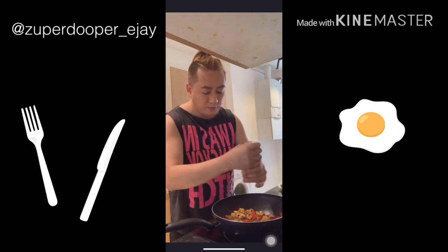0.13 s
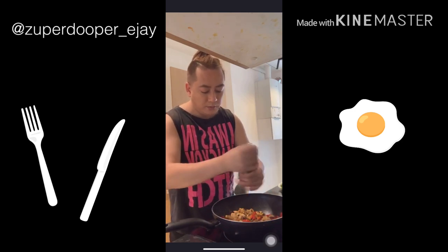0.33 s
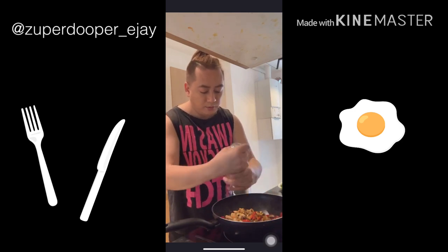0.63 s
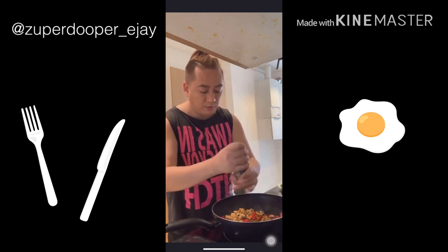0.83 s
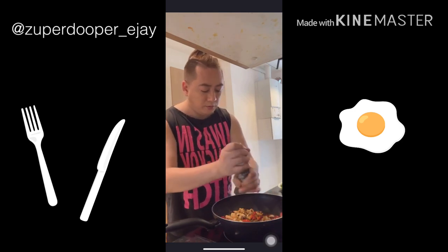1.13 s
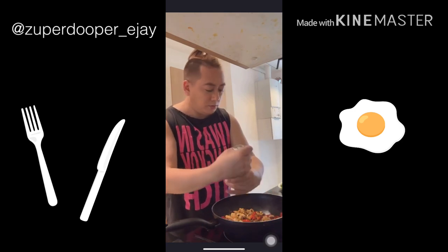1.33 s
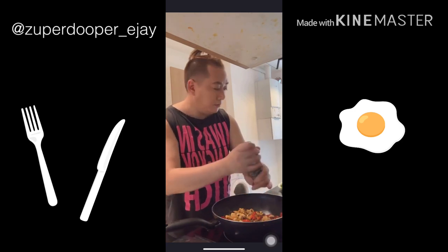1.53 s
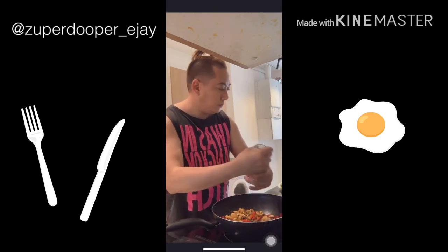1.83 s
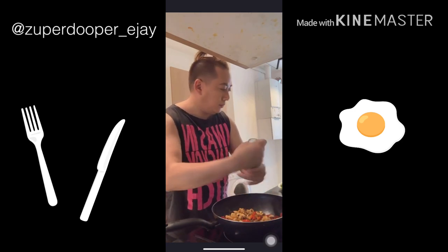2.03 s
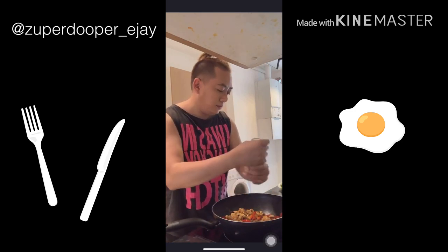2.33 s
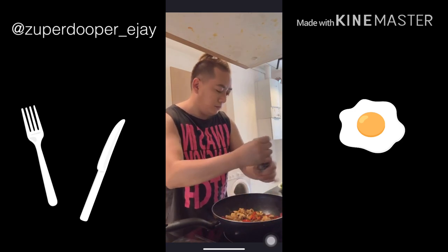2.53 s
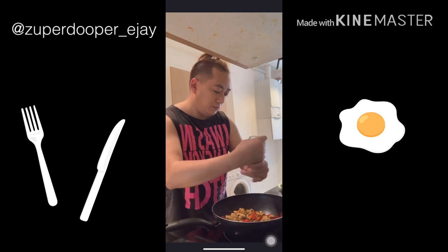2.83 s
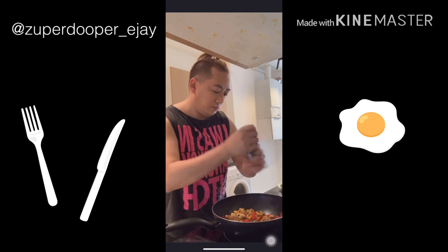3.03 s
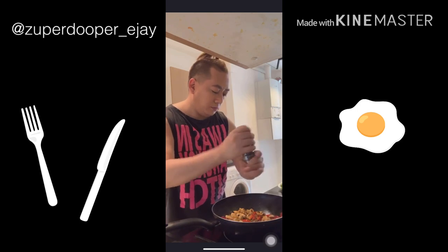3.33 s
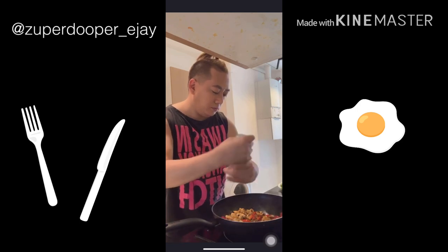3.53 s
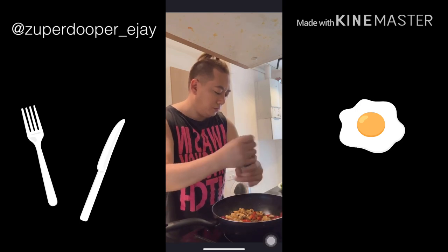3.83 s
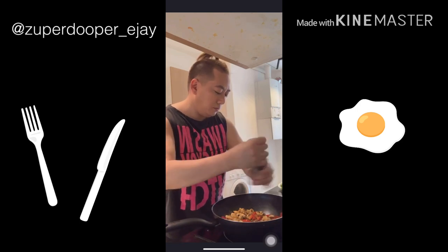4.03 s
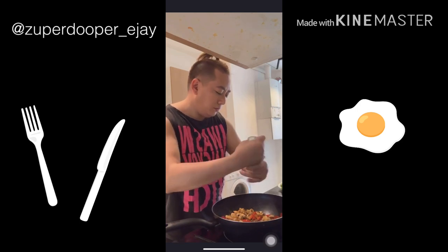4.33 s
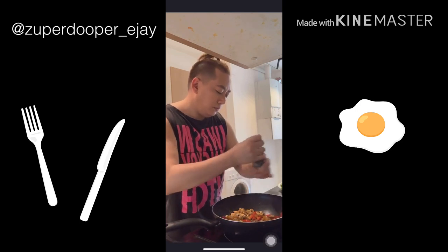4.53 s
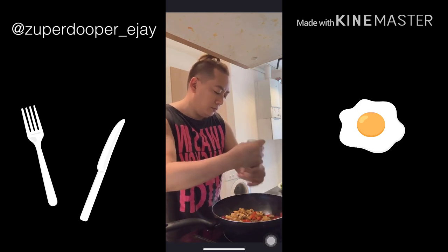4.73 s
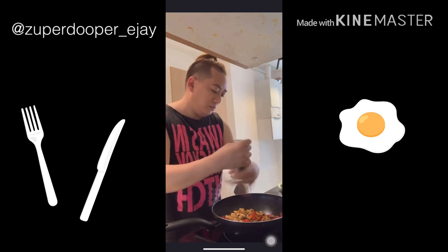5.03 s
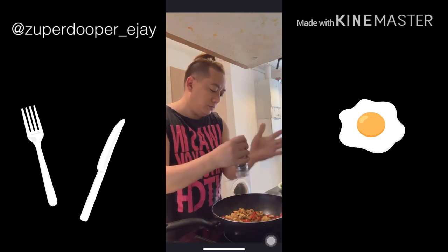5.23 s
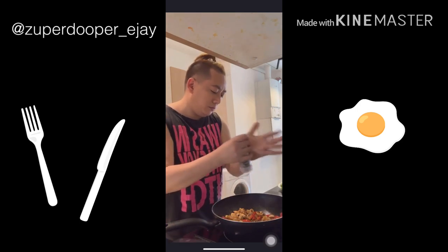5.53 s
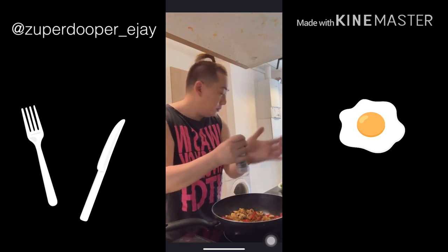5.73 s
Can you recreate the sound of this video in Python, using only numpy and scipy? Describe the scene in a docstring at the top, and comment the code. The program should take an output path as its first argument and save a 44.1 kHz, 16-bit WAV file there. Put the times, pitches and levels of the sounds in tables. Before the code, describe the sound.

A hand pepper mill crunches peppercorns in sharp, irregular cracks about three twists a second, then gets shaken, over a low fan hum.

```python
"""A hand pepper mill is twisted back and forth over a wok in a small kitchen, then shaken.
Shaped noise bursts make the peppercorns crack in the burr and the cap knock; the end of a crack dies away
at the start, then grainy noise makes palms scuff the barrel. Showers of random taps rattle loose corns in
the glass, and hard walls ring after each. An extractor fan hums throughout, a wavering sine over filtered
noise, and sparse pops sizzle faintly."""
import sys
import numpy as np
from scipy import signal
from scipy.fft import rfft, irfft, next_fast_len
from scipy.io import wavfile
from scipy.ndimage import uniform_filter1d, minimum_filter1d

SR = 44100
rng = np.random.default_rng(int(sys.argv[2]) if len(sys.argv) > 2 else 0)


def dump_mix(stems):
    """Bounce the given channels to the path in sys.argv[1] as a 16-bit WAV at rate SR."""
    frames = np.atleast_2d(stems).T  # one column per channel
    limited = np.clip(frames, -1, 1)  # hard clip at full scale
    pcm = np.round(limited * 32767).astype(np.int16)
    wavfile.write(sys.argv[1], SR, pcm)


N = 260053  # length of the scene (samples)


def amp(db):
    """Decibels to gain."""
    return 10 ** (np.asarray(db) / 20)


def unit(x):
    """Scales to an rms of one."""
    return x / np.sqrt(np.mean(x ** 2) + 1e-20)


def read(points, hz):
    """Reads a table on a log-frequency axis."""
    f, value = np.transpose(points)
    return np.interp(np.log(hz + 1), np.log(f + 1), value)


def add(mix, s, sound):
    """Mixes a sound in at time s."""
    part = mix[max(round(s * SR), 0):][:len(sound)]
    part += sound[:len(part)]


def colour(x, points):
    """Filters by a smooth spectrum."""
    size = next_fast_len(len(x) + 2048)
    gain = amp(read(points, np.fft.rfftfreq(size, 1 / SR)))
    return irfft(rfft(x, size) * gain, size)[:len(x)]


def drift(rate_hz):
    """Slow random wander with an rms of one."""
    hz = np.fft.rfftfreq(N, 1 / SR)
    return unit(irfft(rfft(rng.standard_normal(N)) / (1 + (hz / rate_hz) ** 4), N))


def flatten(x):
    """Gives a burst an even spectrum and keeps its phases, as when heard from all sides at once."""
    spectrum = rfft(x, 4096)
    return irfft(spectrum / (abs(spectrum) + 1e-12))[:len(x)]


# air rushing through the hood: f [Hz], relative level [dB per Hz]
AIR_COLOUR = [(20, -21.5), (42, -14.5), (58, -8), (90, 1), (130, -3), (152, -12), (215, 1.5), (270, -3),
              (340, -10), (560, -21), (760, -17), (1050, -17.5), (1300, -20.5), (2700, -26), (4500, -33),
              (9000, -36)]
# resonances of the hood and its duct: f [Hz], nominal width [Hz], rms level [dB]
DUCT_MODES = [(107.45, 14, -29), (117.9, 11, -31), (169, 11, -38.5), (201.5, 7.8, -38), (409.8, 22, -46.5),
              (756, 32, -48), (986, 70, -45.5), (1082, 12, -49), (1807, 69, -50.5), (2787, 41, -50.5)]
FAN_HZ = 80.7


def fan(hum_db=-23, air_db=-27.0, wobble=0.0031, throb_db=0.6):
    """The rotor hums on one low note while turbulent air stirs the duct's resonances."""
    turns = np.cumsum(FAN_HZ * (1 + wobble * drift(1.9))) / SR
    hum = amp(hum_db + throb_db * drift(3.3)) * unit(np.sin(2 * np.pi * turns))
    hz = np.fft.rfftfreq(N, 1 / SR)
    duct = np.zeros(N)
    for f, width_hz, db in DUCT_MODES:
        resonance = 1 / (1 + ((hz - f) / (width_hz * 0.56)) ** 2)
        duct += amp(db) * unit(irfft(rfft(rng.standard_normal(N)) * resonance, N))
    air = amp(air_db) * unit(colour(rng.standard_normal(N), AIR_COLOUR))
    return hum + duct + air


# frying in the wok: f [Hz], relative level [dB per Hz]
SIZZLE_COLOUR = [(800, -20), (2500, 2.5), (4500, -1), (6500, -0.5), (8000, -2), (9000, -9.5)]


def sizzle(level_db=-41, pops_per_s=5000, spread_db=3, swell_db=5.0):
    """Countless tiny steam bubbles burst in the wok."""
    sizes = rng.standard_normal(N) * amp(spread_db * rng.standard_normal(N))
    pops = sizes * (rng.random(N) < pops_per_s / SR)
    return amp(level_db + swell_db * drift(3.6)) * unit(colour(pops, SIZZLE_COLOUR))


# the end of a crack already dying away (first row), then palms scuff on the barrel:
# t [s], length [s], rms level [dB], centre f [Hz]
CRACK_END_AND_SCUFFS = [(0.0, 0.019, -25.5, 4070), (0.047, 0.042, -34, 1770), (1.385, 0.099, -37, 2220),
                        (2.738, 0.041, -35, 2400), (4.065, 0.029, -37, 2200), (5.407, 0.039, -35, 2220)]


def crack_end_and_scuffs(grain_db=3):
    """Short, grainy, hollow noise: the end of a crack, then skin sliding over the barrel."""
    out = np.zeros(N)
    for s, length_s, db, centre_hz in CRACK_END_AND_SCUFFS:
        count = round(length_s * SR)
        rub, slips = rng.standard_normal((2, SR // 4))[:, :count]
        grain = amp(grain_db * unit(uniform_filter1d(slips, size=80)))
        rub = rub * grain * signal.windows.tukey(len(rub), .5)
        band = [(centre_hz / 2, -20), (centre_hz, 0), (centre_hz * 1.2, -10), (centre_hz * 5, -24)]
        add(out, s, amp(db) * unit(colour(rub, band)))
    return out


# ring time of the kitchen: f [Hz], t60 [s]
RING_TIMES = [(300, .5), (2000, 0.42), (4000, 0.77), (6500, 0.5), (9000, 0.54)]


def echo_tail(build_s=0.0036, grain_db=3.5):
    """Reflections thicken over the first milliseconds, then each band dies at its own speed."""
    count = SR * 3 // 4
    taps = rng.choice([-1, 1], count) * amp(grain_db * rng.standard_normal(count))
    taps = taps * (rng.random(count) < 1 / 14)  # one sample in 14 holds a reflection, on average
    hz, t, bands = signal.stft(taps, SR, nperseg=256)
    decay = amp(-60 * t / read(RING_TIMES, hz)[:, None])
    tail = signal.istft(bands * decay, SR, nperseg=256)[1]
    tail = tail * np.minimum(np.arange(len(tail)) / SR / build_s, 1) ** 2
    return tail / np.linalg.norm(tail)


# colour of the kitchen's echo: f [Hz], level [dB]
WALL_COLOUR = [(500, 6.5), (2000, 2), (3500, 2.5), (5000, -3.5), (6400, -3.5), (9000, -2.5)]


def kitchen(x, count=8, sets_per_s=13):
    """The mill moves with the hands, so its echo passes through changing sets of reflections."""
    place = np.arange(N) / SR * sets_per_s
    out = np.zeros(N)
    for k in range(count):
        # neighbouring sets crossfade, round and round
        away = np.minimum(abs((place - k) % count - count / 2), 1)
        out += signal.fftconvolve(x * np.cos(np.pi / 2 * away), echo_tail())[:N]
    return colour(out, WALL_COLOUR)


# fragments: level at the two ends of a turn, scatter in size, share sent into the room (dB)
EASE_DB, SCATTER_DB, CRUSH_ROOM_DB = -2, 4.5, 3
# fragments: brightness from 7.8 kHz up and its scatter from one to the next (dB)
CRUSH_BRIGHT_DB, BRIGHT_SCATTER_DB = -0.5, -0.5


def fragments(start_s, length_s, db, weight_db, count):
    """One turn of the burr breaks fragments at uneven moments, hardest in mid-turn."""
    when, size, bright = rng.random((count, 3)).T
    along = (np.arange(count) + when) / count
    levels_db = db + EASE_DB * (2 * along - 1) ** 2 + SCATTER_DB * (2 * size - 1)
    brights_db = CRUSH_BRIGHT_DB + BRIGHT_SCATTER_DB * (2 * bright - 1)
    return [(start_s + length_s * a, level_db, weight_db, bright_db, CRUSH_ROOM_DB)
            for a, level_db, bright_db in zip(along, levels_db, brights_db)]


# weight around 2 kHz in hard and in light turns, a loud crack's share sent into the room (dB)
CRUSH_WEIGHT_DB, LIGHT_WEIGHT_DB, CRACK_ROOM_DB = -1, -1.5, -3
NIP_S = .035  # the burr nips the corns this long before it bites (s)
CHIP_S, CHIP_DB = .006, -14.5  # a corn chips before it splits: mean lead (s), level against the crack (dB)
BACK_LAG_S, BACK_S = 0.13, .08  # back turn: delay from mid-twist to its own middle (s), length (s)
# whole peppercorns that split with a loud crack:
# t [s], relative level [dB], weight around 2 kHz [dB], brightness from 7.8 kHz up [dB]
LOUD_CRACKS = [(0.092, -7.5, 4.5, -3.5), (0.1168, -10, 7, 2), (0.26, -11, 6, 1.5), (0.371, -17.5, -4, -15),
               (0.4225, -6, 3.5, 2), (0.4492, -6.5, -2, -1), (0.4832, -8, -19, -5), (0.6216, -13, 2, 7),
               (0.7635, -6.5, 0, 5.5), (0.8013, -13.5, 8.5, -4), (0.8192, -9.5, -4, 0),
               (0.9383, -12.5, 2, 4), (0.9558, -6, -4, 2), (0.995, -12, -4, 0), (1.1068, -12, 6, 1),
               (1.153, -4.5, 10, 6), (1.195, -11, -9, 8), (1.291, -10.5, 0, 5), (1.3151, -10.5, 3, 5),
               (1.4703, -5, -15, 5), (1.4894, -13.5, 0, -3), (1.8553, -7.5, -1, -4), (1.9512, -8.5, -6, 1),
               (1.995, -12.5, 6, 9.5), (2.012, -8.5, -4, 1.5), (2.036, -8, 1, 9), (2.138, -14, 0, -9),
               (2.1537, -15, -10, 1), (2.169, -9.5, -2, 4), (2.1992, -6.5, -21, 0), (2.251, -4.5, -13, 1),
               (2.413, -4.5, -2.5, 4), (2.5867, -7, -6, -3), (2.6632, -13.5, 0, -1),
               (2.8292, -4.5, -8, 2.5), (2.852, -8, 5, 7), (2.9653, -5.5, -5, 2), (2.99, -6.5, -12, -5),
               (3.0132, -7.5, -3, 3), (3.1371, -8.5, -9, -5), (3.1833, -4, -2, -1), (3.215, -4, -9, 3.5),
               (3.3701, -6, -0.5, -4), (3.4013, 0, 2, 1), (3.5051, -11, -5, 0), (3.576, -12.5, 1, 2.5),
               (3.753, -5.5, -2, 3), (3.7663, -2, 2, 7), (3.8117, -9.5, -8, 1.5), (3.8922, -13, 0, -7),
               (3.963, -9.5, 0, -1.5), (4.0811, -13, 3, -4.5), (4.1077, -6, -1, 8), (4.149, -11.5, 12, 3),
               (4.261, -21, 2, -13), (4.3018, -7.5, -7, -1), (4.3108, -7, -14, -5), (4.348, 0.5, -12, 8),
               (4.4964, -5.5, -4, 0.5), (4.5086, -4.5, 8, 4), (4.823, -10.5, 6.5, 2),
               (4.9463, -19.5, 11, 0)]
# the wrist twists about three times a second, crushing fragments, then turns back lightly:
# start t [s], length [s], relative levels of twist, of the nip before it and of the back turn [dB]
WRIST_TWISTS = [(0.094, 0.042, -16.5, -35, -28), (0.445, 0.069, -13.5, -19.5, -29),
                (0.765, 0.071, -18, -31, -19), (1.133, 0.083, -15, -21, -27),
                (1.45, 0.035, -27, -30.5, -49), (1.855, .022, -22, -45, -33), (2.215, .06, -14, -27, -26),
                (2.574, 0.09, -20.5, -19.5, -21), (2.991, 0.082, -13, -20, -24),
                (3.351, .065, -13, -25, -31), (3.752, 0.066, -20.5, -23.5, -25),
                (4.098, 0.085, -17, -29, -23), (4.485, 0.041, -21, -17, -45)]


def breaks():
    """All that breaks in the burr: (t/s, level/dB, weight/dB, brightness/dB, share to the room/dB)."""
    rows = []
    for s, db, weight_db, bright_db in LOUD_CRACKS:
        chip_s = s - CHIP_S * (.5 + rng.random())
        rows.append((chip_s, db + CHIP_DB, LIGHT_WEIGHT_DB, bright_db, CRACK_ROOM_DB))
        rows.append((s, db, weight_db, bright_db, CRACK_ROOM_DB))
    for start_s, length_s, db, nip_db, back_db in WRIST_TWISTS:
        back_start_s = start_s + length_s / 2 + BACK_LAG_S - BACK_S / 2
        rows += fragments(start_s - NIP_S, NIP_S, nip_db, LIGHT_WEIGHT_DB, count=3)
        rows += fragments(start_s, length_s, db, CRUSH_WEIGHT_DB, count=9)
        rows += fragments(back_start_s, BACK_S, back_db, LIGHT_WEIGHT_DB, count=4)
    return rows


RIPPLE_DB = 3  # each piece rings in its own way: unevenness of its spectrum (dB)
# colour of a crack leaving the mill: f [Hz], level [dB]
MILL_COLOUR = [(300, -34), (1200, -26.5), (1700, -8.5), (2900, -7), (3500, -4), (4600, -2), (5700, -1),
               (6300, 3), (7200, -1.5), (7900, 1), (9000, -4), (10000, -9)]


def cracks(rise_s=0.00074, fade_s=0.0024, splinter_db=-12, splinter_s=0.00974,
           crumble_db=-23, crumble_s=0.018):
    """Each corn snaps, splits twice more and crumbles; returns the direct sound and what enters the room."""
    t = np.arange(SR // 25) / SR
    hz = np.arange(300, 10400, 400)
    direct, sent = np.zeros(N), np.zeros(N)
    for s, db, weight_db, bright_db, room_db in breaks():
        grit, crumbs = rng.standard_normal((2, len(t)))
        starts = np.r_[0, splinter_s * rng.uniform(.2, 1, 2)]  # the snap, then two splinters
        age = np.maximum(t - starts[:, None], 0)
        snaps = np.minimum(age / rise_s, 1) * np.exp(-np.maximum(age - rise_s, 0) / fade_s)
        splinters = amp(splinter_db) * snaps[1:]
        dust = amp(crumble_db + 6.6 * unit(uniform_filter1d(crumbs, size=50))) * np.exp(-t / crumble_s)
        burst = grit * np.sqrt(snaps[0] ** 2 + np.sum(splinters ** 2, axis=0) + dust ** 2)
        # each piece has its own weight around 2 kHz and its own brightness at the top
        tone = [(1000, 0), (1700, weight_db), (2600, weight_db),
                (3900, 0.0079), (5000, 0.0031), (7800, np.clip(bright_db, -9, 10))]
        ripple = RIPPLE_DB * rng.standard_normal(len(hz))
        spectrum = np.c_[hz, read(MILL_COLOUR, hz) + read(tone, hz) + ripple]
        add(direct, s, amp(db) * unit(colour(burst, spectrum)))
        add(sent, s, amp(db + room_db) * unit(colour(flatten(burst), spectrum)))
    return direct, sent


# the cap knocks as the grip changes: t [s], relative level [dB], ring f [Hz]
CAP_KNOCKS = [(0.0902, -28, 3700), (1.856, -18.5, 4000), (4.3023, -21.5, 3330), (4.824, -19.5, 3270)]
# broad resonance of the hand-damped cap: multiple of the ring frequency [ratio], level [dB]
CAP_COLOUR = [(.3, -28), (.55, -16.5), (.7, -14), (.9, -3.5), (1.03, 0.5), (1.2, -5), (1.5, -12),
              (2.0, -6.5), (2.8, -24)]


def knocks(fade_s=0.011):
    """The cap chatters against the barrel for a few milliseconds, coloured by its resonance."""
    t, out = np.arange(SR // 25) / SR, np.zeros(N)
    for s, db, ring_hz in CAP_KNOCKS:
        chatter = flatten(rng.standard_normal(len(t)) * np.exp(-t / fade_s))
        resonance = [(ring_hz * ratio, gain_db) for ratio, gain_db in CAP_COLOUR]
        add(out, s, amp(db) * unit(colour(chatter, resonance)))
    return out


# loose corns thrown against the glass:
# t [s], relative level [dB], rise [s], fade [s], relative level of the first hard tap [dB]
CORN_SHAKES = [(5.218, -33.5, .006, 0.018, -32), (5.406, -19, 0.0029, 0.031, -12),
               (5.571, -18, 0.0017, 0.023, -19), (5.689, -26, 0.011, 0.051, -44),
               (5.744, -17, 0.0059, 0.019, -20.5), (5.84, -26, 0.015, 0.018, -29)]
# colour of the glass chamber: f [Hz], level [dB]
GLASS_COLOUR = [(600, -20), (1600, -23), (2300, -13), (3400, -24), (4300, -16), (5700, -11), (6100, -1),
                (6450, 5), (6900, -2), (7500, -9.5), (9000, -15)]


def shakes(taps_per_s=900, spread_db=4, tap_s=0.0061, tap_db=-11.5):
    """Each shake lands with one hard tap and a shower of tiny ones on the glass."""
    t, out = np.arange(SR // 8) / SR, np.zeros(N)
    for s, db, rise_s, fade_s, first_db in CORN_SHAKES:
        taps = rng.choice([-1, 1], len(t)) * amp(spread_db * rng.uniform(-1.6, 1.5, len(t)))
        taps = taps * (rng.random(len(t)) < taps_per_s / SR)
        shape = np.minimum(t / rise_s, 1) ** 2 * np.exp(-np.maximum(t - rise_s, 0) / fade_s)
        add(out, s, amp(db) * unit(colour(taps * shape, GLASS_COLOUR)))
        hard_tap = rng.standard_normal(len(t)) * np.exp(-t / tap_s)
        add(out, s, amp(first_db + tap_db) * unit(colour(hard_tap, MILL_COLOUR)))
    return out


def scene(crack_db=-14.0, crack_room_db=-17, knock_db=-5, knock_room_db=-5.5,
          shake_db=-11, shake_room_db=-16):
    """The mill close by, its echo, the fan and the wok."""
    rub = crack_end_and_scuffs()
    crunch, sent = cracks()
    cap, rattle = knocks(), shakes()
    direct = amp(crack_db) * crunch + amp(knock_db) * cap + amp(shake_db) * rattle + rub
    to_room = amp(crack_room_db) * sent + amp(knock_room_db) * cap + amp(shake_room_db) * rattle + rub / 2
    return (direct + kitchen(to_room) + fan() + sizzle())[None]


EDGE_HZ = 9080  # upper band limit


def record(dry):
    """A fast limiter between two equal band limits holds the sharpest cracks under full scale."""
    lowpass = signal.firwin(601, EDGE_HZ, window=("kaiser", 8), fs=SR)
    heard = signal.oaconvolve(dry, lowpass[None], "same")
    gain = 1 / np.maximum(abs(heard) / .98, 1)
    gain = uniform_filter1d(minimum_filter1d(gain, size=31), size=21)
    return signal.oaconvolve(heard * gain, lowpass[None], "same")


dry = scene()
out = record(dry)
dump_mix(out)
```